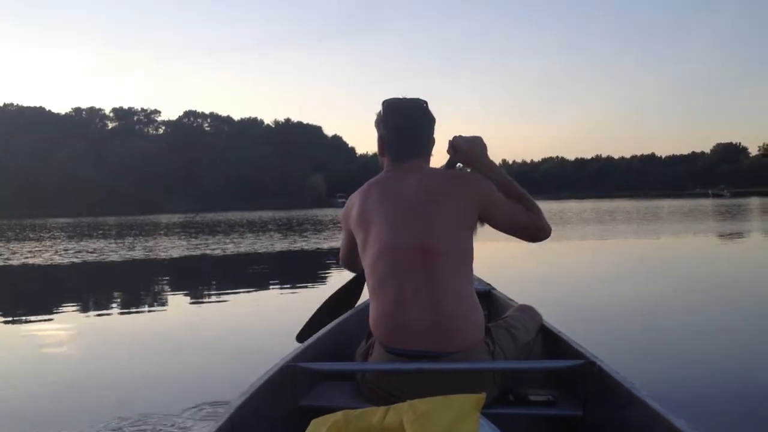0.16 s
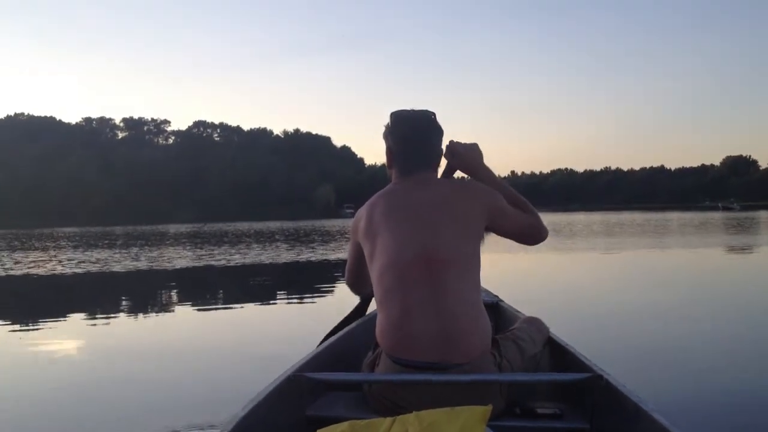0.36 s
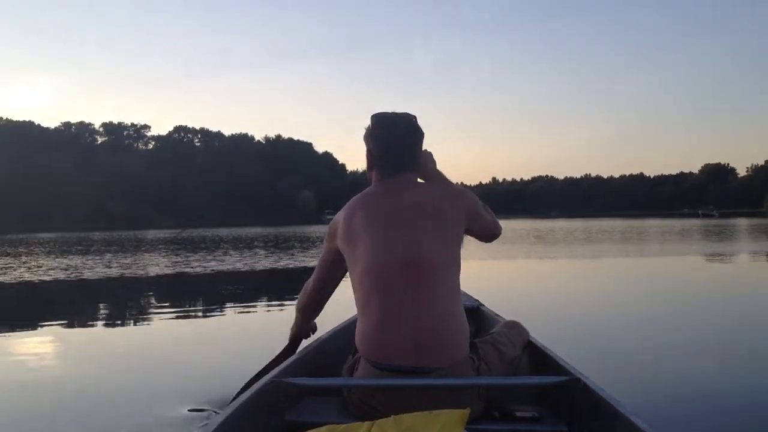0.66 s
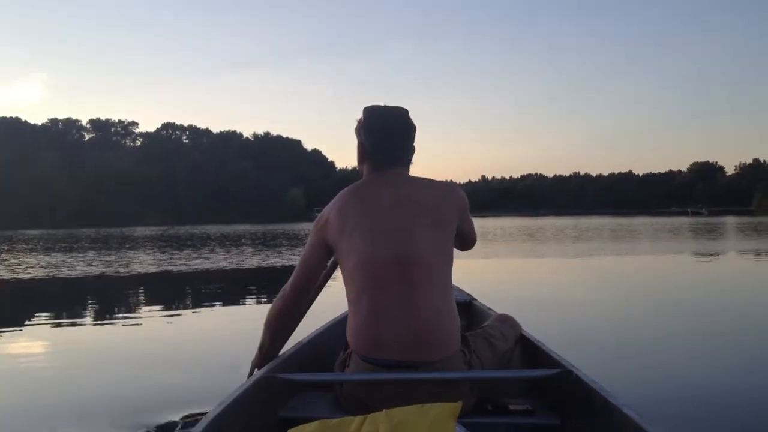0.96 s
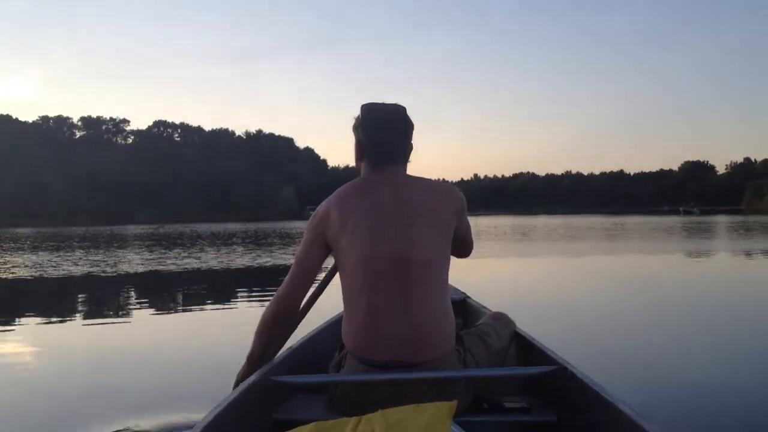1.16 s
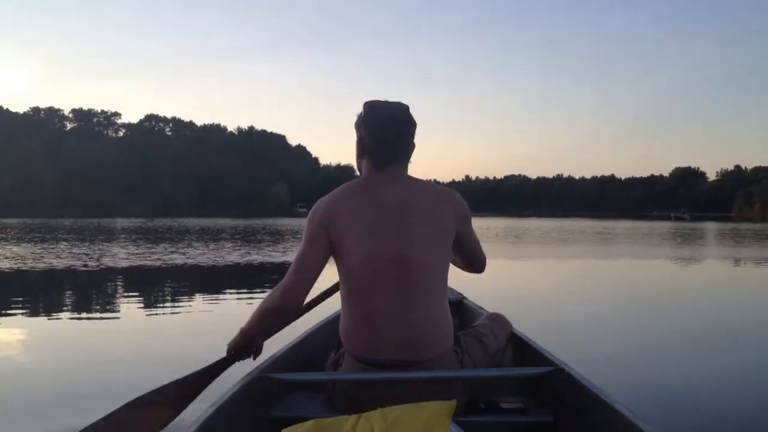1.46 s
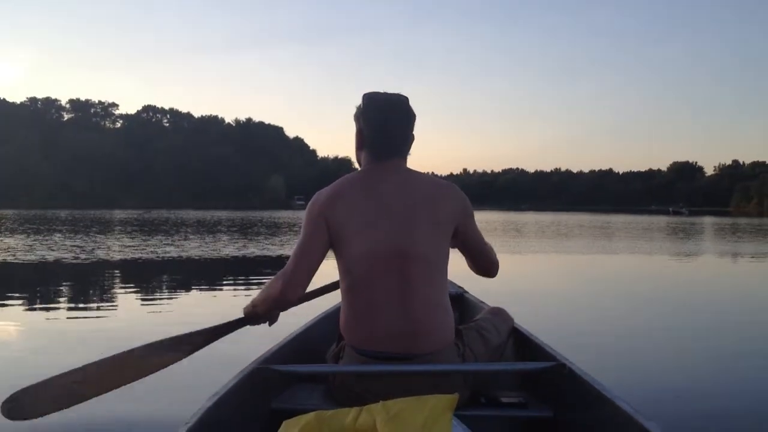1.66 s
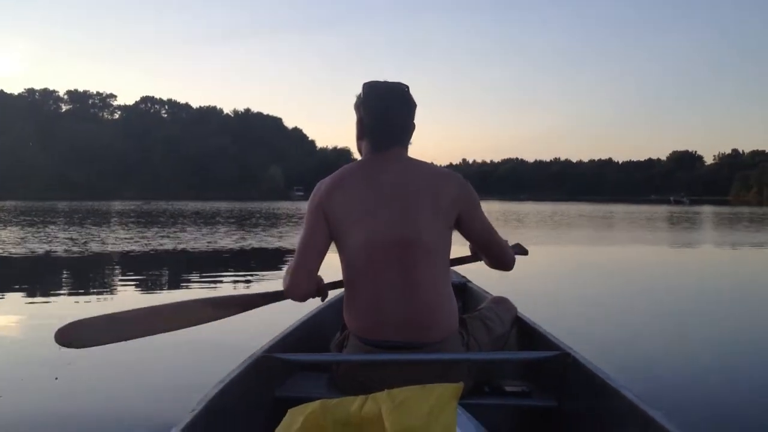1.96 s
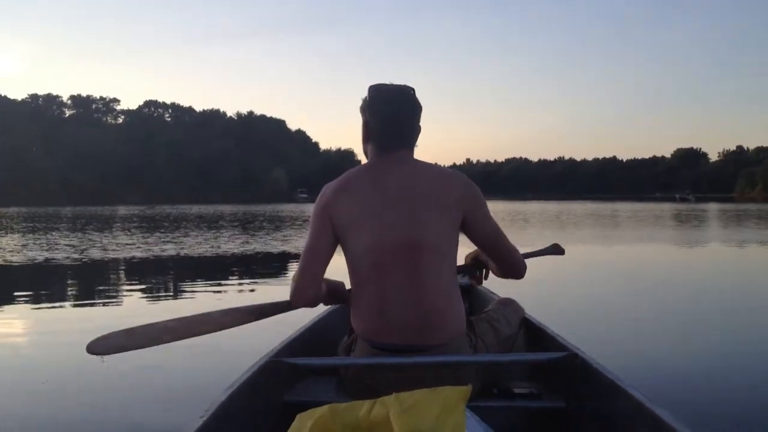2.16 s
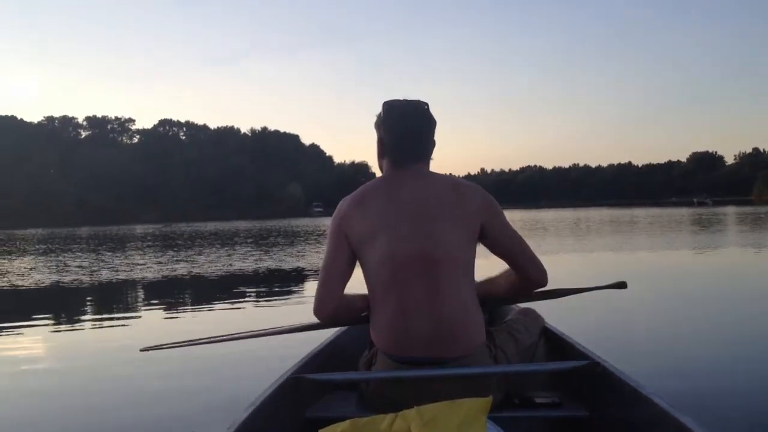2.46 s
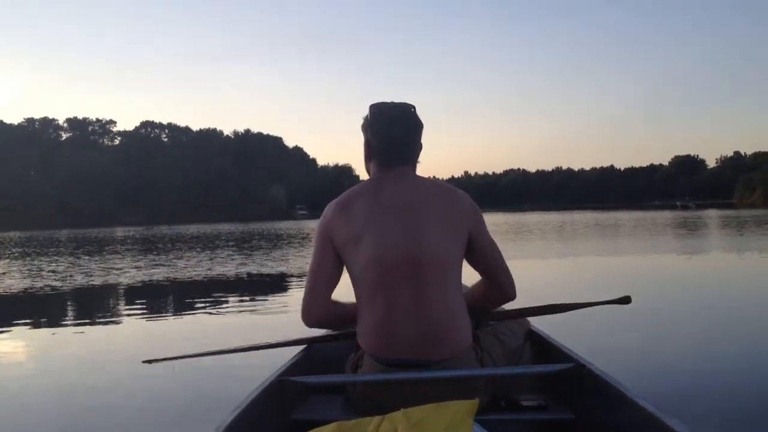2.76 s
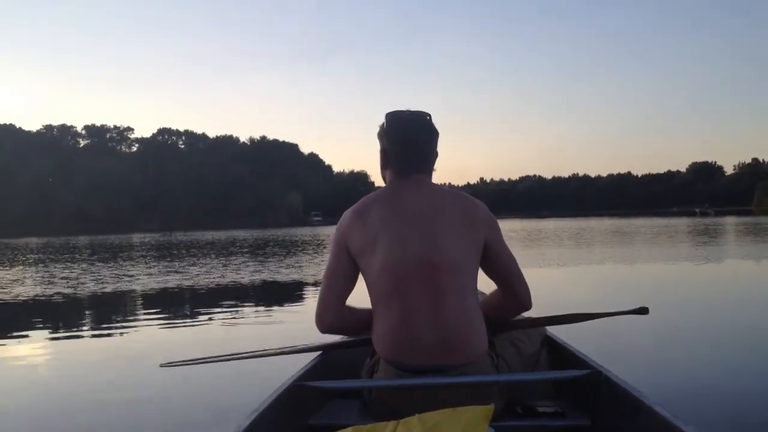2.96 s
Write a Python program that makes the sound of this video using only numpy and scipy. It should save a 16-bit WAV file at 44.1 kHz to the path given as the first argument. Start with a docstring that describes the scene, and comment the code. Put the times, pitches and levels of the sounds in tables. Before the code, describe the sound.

Water trickles and drips from a canoe paddle on a quiet lake. Light ticks and a small bump come first, then the blade swishes in softly at about 0.5 seconds. Gurgles and distinct drops follow from 0.9 to 2.2 seconds, with the wet shaft hissing faintly through the hands around 2 seconds. At 2.8 seconds the wooden paddle knocks sharply on the aluminum hull, which rings briefly.

```python
"""Paddle and aluminium canoe

A wooden paddle is drawn through a calm lake and lifted; trapped air bubbles resonate as water gurgles
round the blade and drips off it. The wet shaft slides through the hands with a hiss of friction, then is
set down across the canoe, its impacts exciting the modes of the hull. A faint hush lies under it all."""
import sys
import numpy as np
from scipy import signal
from scipy.fft import rfft, irfft
from scipy.io import wavfile

SR = 44100
rng = np.random.default_rng(int(sys.argv[2]) if len(sys.argv) > 2 else 0)


def store_wav(level_fs):
    """Save 16-bit WAV to argv[1]."""
    pcm = np.round(np.clip(np.atleast_2d(level_fs), -1, 1) * 32767)
    wavfile.write(sys.argv[1], SR, pcm.T.astype(np.int16))


N = 136710


def from_db(db):
    """Decibels to amplitude ratio."""
    return 10 ** (np.asarray(db) / 20)


def rms_one(x):
    """Normalisation to unit rms."""
    return x / np.sqrt(np.mean(x ** 2) + 1e-20)


def envelope(rows):
    """Gain at every sample, interpolated in decibels."""
    return from_db(np.interp(np.arange(N) / SR, *np.transpose(rows)))


def at_hz(points, hz):
    """Interpolation on a log-frequency axis."""
    frequencies, values = np.transpose(points)
    return np.interp(np.log(hz), np.log(frequencies), values)


def add(out, start_s, sound):
    """Superposition of a delayed sound."""
    i = int(start_s * SR)
    out[i:i + len(sound)] += sound[:len(out) - i]


def decay(t60, size=SR):
    """Exponential damping: 60 dB in t60 seconds."""
    return from_db(-60 * np.arange(size) / SR / t60)


def flicker(depth_db, rate_hz):
    """Random amplitude modulation."""
    steps = rng.standard_normal(N // 10)
    return from_db(depth_db * np.interp(np.arange(N) / SR * rate_hz, np.arange(len(steps)), steps))


def band(x, hz, width):
    """Band-pass filter; width is the natural log of upper edge over centre."""
    edges = np.minimum(hz * np.exp([-width, width]), [.45 * SR, .48 * SR])
    return signal.sosfilt(signal.butter(2, edges, "band", fs=SR, output="sos"), x)


def noise_bands(spectrum, size=N):
    """Third-octave noise bands whose sum has unit rms, and their centres."""
    centres = 32 * 2 ** (np.arange(28) / 3)
    bands = []
    for hz in centres:
        white = rng.standard_normal(size + SR // 4)
        bands.append(from_db(at_hz(spectrum, hz)) * band(white, hz, np.log(2) / 6)[-size:])
    return np.array(bands) / sum(bands).std(), centres


def coloured_noise(spectrum, size=N):
    """Broadband noise as a sum of its bands."""
    return noise_bands(spectrum, size)[0].sum(0)


def damped_sine(hz, db, t60):
    """Free vibration of a damped oscillator."""
    t = np.arange(SR) / SR
    return from_db(db) * decay(t60) * np.sin(2 * np.pi * hz * t)


def burst(hz, width, t60):
    """A band-limited noise transient of unit peak."""
    click = band(rng.standard_normal(SR // 8) * decay(t60, SR // 8), hz, width)
    return click / np.abs(click).max()


# Open air. Each row: frequency in Hz, relative spectral density in dB.
AIR_SPECTRUM = [(18, -84), (30, -55), (81, -23), (92, -10.5), (132, -1.5), (247, -1.5), (394, -1.5),
                (511, -6.5), (794, -5.5), (953, -4), (1440, -14), (1730, -15.5), (3320, -31), (3980, -28),
                (4540, -28), (5300, -29.5), (7830, -26), (10400, -39.5), (15000, -28)]
# A thin high chirring. Each row: time in seconds, level in dB.
WHINE_LEVELS = [(0, -85), (.5, -79), (.7, -78), (1.2, -80), (1.4, -101), (1.7, -79), (2.3, -81), (3.1, -74)]


def air():
    """Ambient noise: a broadband hush, and a band narrow enough to be heard as a pitch."""
    bin_hz = np.maximum(np.arange(N // 2 + 1) * SR / N, 1)
    spectrum = rfft(rng.standard_normal(N)) * from_db(at_hz(AIR_SPECTRUM, bin_hz))
    hush = rms_one(irfft(spectrum, N)) * flicker(depth_db=0.86, rate_hz=27)
    whine_gain = envelope(WHINE_LEVELS) * flicker(depth_db=1.7, rate_hz=18)
    whine = rms_one(band(rng.standard_normal(N), hz=4550, width=0.035))
    return from_db(-57.5) * hush + whine_gain * whine


def bubbles(per_s, low_hz, high_hz, cycles, tilt_db=0, pitches=20, spread_db=4.5, max_spreads=3):
    """Bubble resonators struck in a Poisson process; each falls 60 dB over the given cycles."""
    out = np.zeros(N)
    for hz in np.geomspace(low_hz, high_hz, pitches):
        births = rng.random(N) < per_s / pitches / SR
        strengths = from_db(spread_db * np.minimum(rng.exponential(1, N), max_spreads))
        note = damped_sine(hz, db=tilt_db * np.log2(hz / low_hz), t60=cycles / hz)
        out += signal.fftconvolve(births * strengths, note)[:N]
    return rms_one(out)


def droplets():
    """Stray fine droplets plink on the lake: the smaller the bubble, the higher its resonance."""
    plinks = bubbles(per_s=26, low_hz=2980, high_hz=8600, cycles=42,
                     pitches=10, spread_db=8.5, max_spreads=2)
    return from_db(-81.5) * plinks


# The shaft sliding through the hands. Each row: time in seconds, hiss level in dB.
SLIDE_LEVELS = [(0, -78), (.45, -77.5), (.58, -83), (.72, -77.5), (1.65, -77.5), (1.86, -62), (1.99, -64),
                (2.06, -69.5), (2.16, -64), (2.28, -69.5), (2.48, -67.5), (2.75, -69), (3.1, -76.5)]
# Its hiss. Each row: frequency in Hz, relative spectral density in dB.
SLIDE_SPECTRUM = [(150, -20), (1000, -1.5), (2500, -3.5), (4000, 0), (5200, -4), (6500, 3.5), (8300, 2),
                  (10200, -16), (12500, 1), (15000, -23)]


def shaft_slide(grains_per_s=130, spatter_db=-5.5):
    """Sliding friction on wet wood makes a hiss with a fine spatter in it."""
    hiss = rms_one(coloured_noise(SLIDE_SPECTRUM) * flicker(depth_db=1.5, rate_hz=400))
    grains = (rng.random(N) < grains_per_s / SR) * rng.standard_normal(N)
    spatter = rms_one(band(grains, hz=7500, width=0.13))
    return (hiss + from_db(spatter_db) * spatter) * envelope(SLIDE_LEVELS)


# The blade swishing into the lake. Each row: time in seconds, level in dB.
SWISH_LEVELS = [(0, -101), (.49, -66), (.52, -64), (.62, -69), (.74, -64.5), (1.1, -97), (1.5, -104),
                (3.1, -84)]
# Its churn. Each row: frequency in Hz, relative spectral density in dB.
SWISH_SPECTRUM = [(80, -23), (400, 4.5), (1200, -6), (2200, -11.5), (3300, -14.5), (6000, -13),
                  (12000, -29)]


def blade_swish():
    """Turbulence round the blade makes a soft, fluctuating noise."""
    churn = coloured_noise(SWISH_SPECTRUM) * flicker(depth_db=5.5, rate_hz=130)
    return rms_one(churn) * envelope(SWISH_LEVELS)


# Fine bubbles as the blade cuts in. Each row: time in seconds, level in dB.
FIZZ_LEVELS = [(.47, -97), (.52, -64), (.61, -66.5), (.68, -73), (.85, -90)]
# Larger bubbles in the flow. Each row: time in seconds, level in dB.
GURGLE_LEVELS = [(0, -99), (.48, -96), (.56, -68), (.75, -74), (1.1, -66), (1.4, -67.5), (1.62, -69.5),
                 (1.85, -64), (2.12, -69), (2.35, -67.5), (2.65, -95), (2.77, -58.5), (3.1, -74.5)]


def trickle():
    """Entrained air rings as clouds of bubbles: a dense fizz, then a lower gurgle."""
    fizz = bubbles(per_s=980, low_hz=1740, high_hz=5200, cycles=21, tilt_db=-5.5)
    gurgle = bubbles(per_s=340, low_hz=978, high_hz=3560, cycles=43, tilt_db=-3)
    return fizz * envelope(FIZZ_LEVELS) + gurgle * envelope(GURGLE_LEVELS)


# Single drops. Each row: start in seconds, bubble peak in dB, initial pitch in Hz,
# bubble T60 in seconds, splash peak in dB.
DROPS = [(.389, -63, 2720, .015, -54.5), (.462, -65, 3400, .015, -52.5), (.611, -52, 2450, 0.066, -63),
         (.906, -44, 1240, 0.05, -72), (0.981, -47.5, 1400, 0.041, -62), (1.057, -55, 2010, 0.025, -64),
         (1.1138, -42.5, 1406, 0.018, -46), (1.232, -50.5, 1250, .014, -53.5),
         (1.267, -50, 1200, 0.035, -73), (1.279, -52, 1410, .03, -70), (1.294, -38.5, 1395, 0.013, -76),
         (1.485, -39, 950, 0.029, -59), (1.527, -53.5, 3340, 0.011, -72), (1.717, -43, 1420, 0.021, -51),
         (1.778, -39.5, 2420, 0.021, -64), (1.8293, -53, 3090, 0.015, -46), (1.838, -43.5, 970, 0.013, -41),
         (1.8515, -38.5, 2415, 0.022, -44), (1.904, -50.5, 3100, 0.0091, -52),
         (1.958, -50, 4370, 0.024, -52), (1.992, -43, 1640, 0.011, -48.5),
         (2.033, -41.5, 2250, 0.011, -42.5), (2.072, -50.5, 2510, 0.033, -60),
         (2.105, -43, 1840, 0.014, -38), (2.1256, -44.5, 1100, 0.0056, -44),
         (2.170, -51.5, 2560, 0.017, -55), (2.745, -53, 2040, .018, -49), (2.760, -54, 1580, .018, -47.5),
         (2.78, -53, 2400, .015, -59), (2.803, -39.5, 2000, 0.034, -63), (2.938, -47, 2830, 0.0092, -46)]


def drips(rise_per_s=7.3, attack_s=0.00033, roughness=0.39):
    """Minnaert resonance: a drop splashes and traps a bubble, whose note rises as it dies."""
    out, t = np.zeros(N), np.arange(SR // 8) / SR
    for start_s, db, hz, t60, splash_db in DROPS:
        glide = np.sin(2 * np.pi * hz * (t + rise_per_s * t * t / 2))
        attack = 1 - np.exp(-t / attack_s)
        wobble = 1 + roughness * rms_one(band(rng.standard_normal(len(t)), hz=250, width=0.67))
        note = glide * attack * decay(t60, len(t)) * wobble
        add(out, start_s, from_db(db) * note / np.abs(note).max())
        add(out, start_s, from_db(splash_db) * burst(hz=2310, width=0.21, t60=0.013))
    return out


def scattered(direct, echo_db=-10):
    """Scattering off hull and lake adds a short diffuse tail."""
    tail = rng.standard_normal(SR // 8) * decay(t60=0.12, size=SR // 8)
    return direct + from_db(echo_db) * signal.fftconvolve(direct, tail / np.linalg.norm(tail))[:N]


# Spray and wood on the boat. Each row: start in seconds, peak in dB, centre in Hz, T60 in seconds.
LIGHT_IMPACTS = [(0.0274, -33, 6220, 0.0057), (.089, -54.5, 6960, .006), (0.287, -48, 6350, 0.012),
                 (0.4304, -44, 5750, 0.055), (0.4318, -50, 11600, 0.031), (0.502, -51.5, 7500, 0.005),
                 (0.599, -53.5, 5400, .035), (1.8533, -45, 6070, 0.034), (1.995, -45, 6800, 0.011),
                 (2.001, -47, 7640, 0.0064), (1.9495, -50, 6040, 0.0043), (2.109, -48, 12300, .01),
                 (2.149, -44, 14500, .03), (2.5236, -44, 7700, 0.0056), (2.867, -41.5, 6640, 0.049),
                 (2.918, -45.5, 7400, 0.054), (2.973, -53, 7500, .008), (3.044, -54, 7260, 0.049)]


def ticks(skirt_db=-14):
    """Brief impacts radiate high frequencies: a bright tick with a faint broad skirt."""
    out = np.zeros(N)
    for start_s, db, hz, t60 in LIGHT_IMPACTS:
        tick = burst(hz, width=0.16, t60=t60)
        skirt = burst(hz=9000, width=0.35, t60=t60)
        add(out, start_s, from_db(db) * (tick + from_db(skirt_db) * skirt))
    return out


# Crowded weak plate modes. Each row: frequency in Hz, relative spectral density in dB.
PLATE_SPECTRUM = [(40, -8), (95, 0), (160, -6), (320, 3.5), (600, -2.5), (780, -5), (1020, -5.5),
                  (1400, -6), (1700, -1.5), (3000, -9), (4200, -17.5), (6800, -16), (10500, -39),
                  (15000, -21)]
# Their damping. Each row: frequency in Hz, T60 in seconds.
PLATE_DECAY = [(100, 1.4), (260, 0.74), (700, 0.49), (1700, 0.21), (3000, 0.1), (4500, 0.14), (12000, 0.05)]
# The crack of contact. Each row: frequency in Hz, relative spectral density in dB.
CRACK_SPECTRUM = [(100, -24), (400, -7), (900, 8.5), (1500, 0), (3000, -0.5), (4000, -21.5), (6500, -1.5),
                  (10500, -29), (15000, -18)]
# Modes of the hull and of the wood. Each row: frequency in Hz, relative level in dB, T60 in seconds.
HULL_MODES = [(144.5, -36, 1.5), (158.8, -38.5, 1.07), (191.2, -42, 1.1), (247, -35, 0.8),
              (322, -25.5, 0.41), (351, -34.5, 0.46), (386.8, -38.5, 0.54), (446.2, -31, 0.49),
              (532, -41.5, 0.25), (680, -38, 0.39), (734, -27.5, 0.21), (844, -35, 0.17), (959, -33, 0.093),
              (996, -38.5, 0.335), (1099, -38, 0.29), (1212, -29, 0.117), (1253, -42, 0.26),
              (1378, -28, 0.14), (1430, -32.5, 0.054), (1535, -29.5, 0.089), (1747, -29.5, 0.124),
              (1884, -30, 0.14), (2176, -37.5, 0.2)]
WOOD_MODES = [(267, -25, 0.085), (429, -29.5, 0.15), (1432, -17.5, 0.032), (3242, -29, .04)]


def impact_response(plate_db=-28.5, crack_db=-16):
    """Modal superposition: wavering hull tones, a wooden thud and a dense plate ring, with a crack."""
    bands, centres = noise_bands(PLATE_SPECTRUM, SR)
    plate = sum(noise * decay(at_hz(PLATE_DECAY, hz)) for noise, hz in zip(bands, centres))
    crack = coloured_noise(CRACK_SPECTRUM, SR) * decay(t60=0.034)
    hull = sum(damped_sine(*mode) * flicker(depth_db=2, rate_hz=36.1)[:SR] for mode in HULL_MODES)
    thud = sum(damped_sine(*mode) for mode in WOOD_MODES)
    return hull + thud + from_db(plate_db) * plate + from_db(crack_db) * crack


# The shaft meeting the gunwales. Each row: start in seconds, impulse in dB, contact time in ms.
SHAFT_CONTACTS = [(0.4315, -32, 0.68), (0.4363, -26, 1.1), (2.8098, -18.5, 0.045), (2.814, -12, 0.097),
                  (2.8176, -19, 0.13), (2.8179, -1.5, 0.2), (2.8223, -1.5, 1.27), (2.848, -11.5, 1.9),
                  (2.8681, -8, 0.85)]


def hull_knocks(radiation_cutoff_hz=140):
    """Force convolved with the impulse response: the longer the contact, the duller the knock."""
    force, ms = np.zeros(N), np.arange(400) * 1000 / SR
    for start_s, db, contact_ms in SHAFT_CONTACTS:
        push = ms * np.exp(-5 * ms / contact_ms)
        add(force, start_s, from_db(db) * push / push.sum())
    vibration = signal.fftconvolve(force, impact_response())[:N]
    radiation = signal.butter(4, radiation_cutoff_hz, "high", fs=SR, output="sos")
    return signal.sosfilt(radiation, vibration)


def scene():
    """Pressures from boat, water and air add at one point."""
    knocks = hull_knocks()
    water = scattered(drips() + trickle()) + blade_swish()
    return (knocks + water + ticks() + shaft_slide() + air() + droplets())[None]


def record(dry, low_hz=40, high_hz=15400):
    """Band limiting: the microphone loses the deep bass, and the top is cut steeply."""
    bass_cut = signal.butter(2, low_hz, "high", fs=SR, output="sos")
    top_cut = signal.ellip(10, .1, 70, high_hz, fs=SR, output="sos")
    return signal.sosfilt(top_cut, signal.sosfilt(bass_cut, dry))


dry = scene()
out = record(dry)
store_wav(out)
```